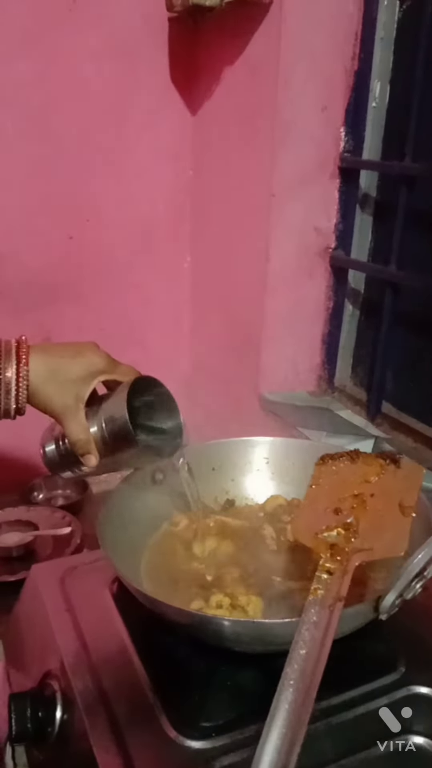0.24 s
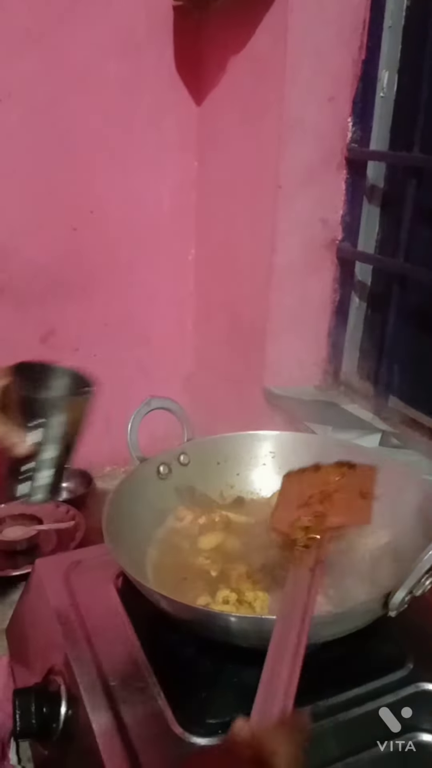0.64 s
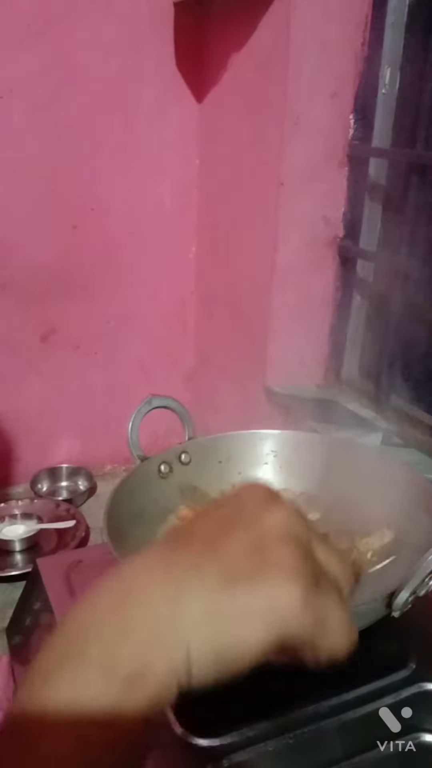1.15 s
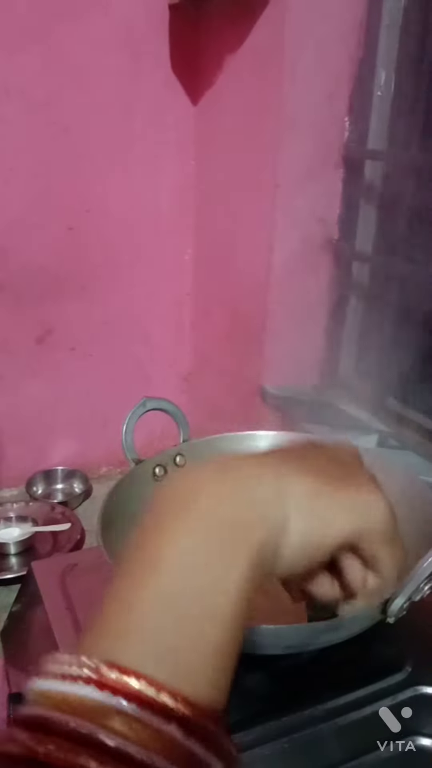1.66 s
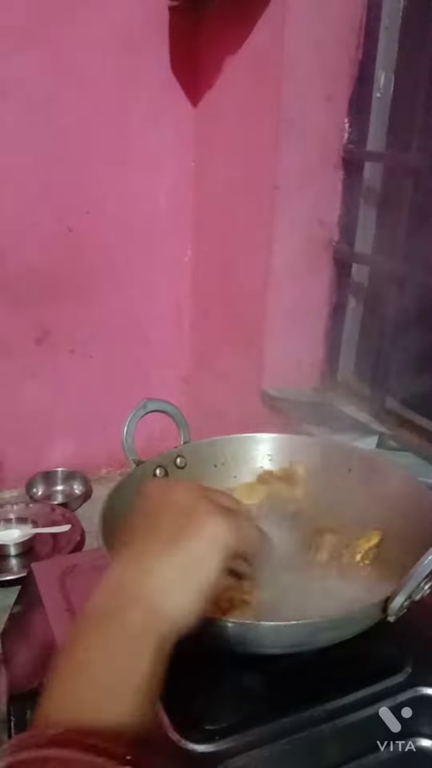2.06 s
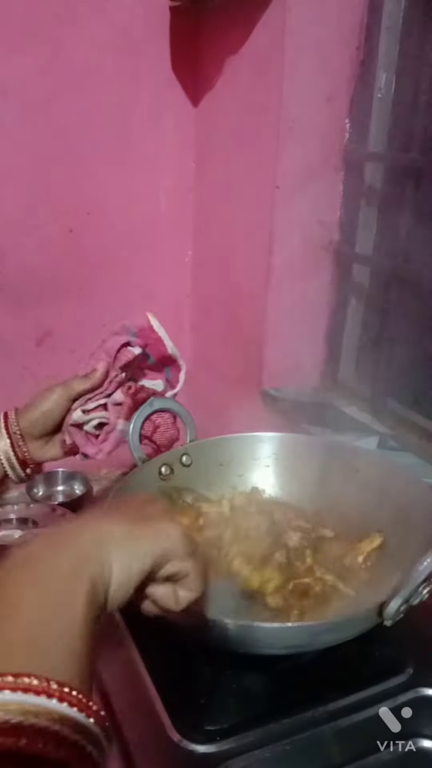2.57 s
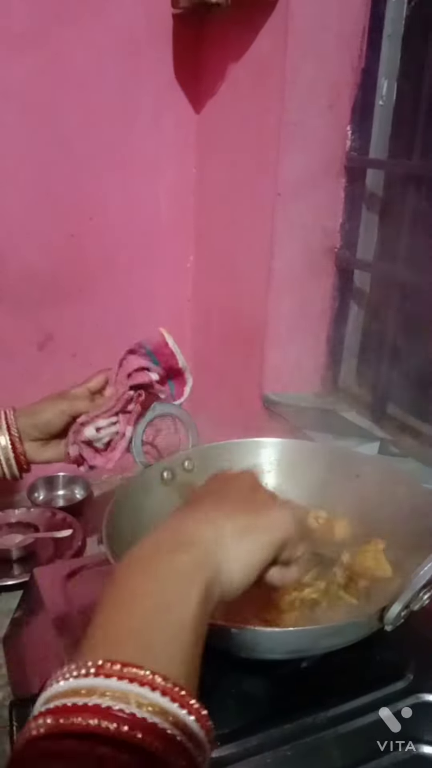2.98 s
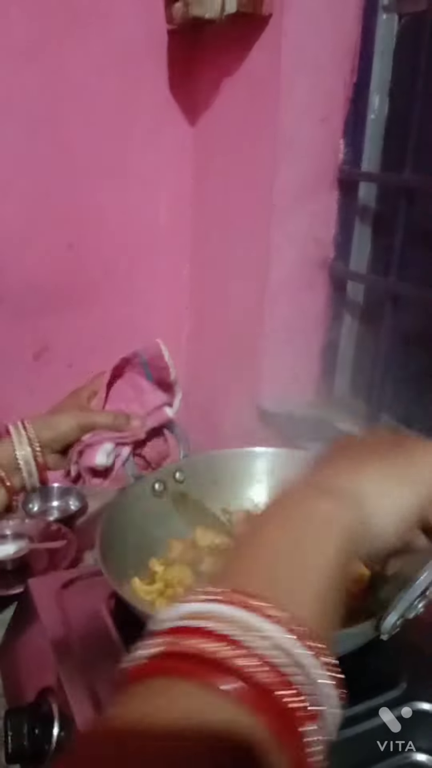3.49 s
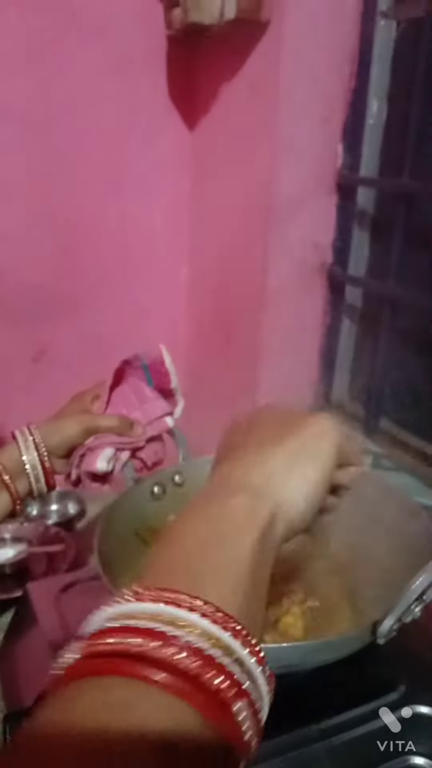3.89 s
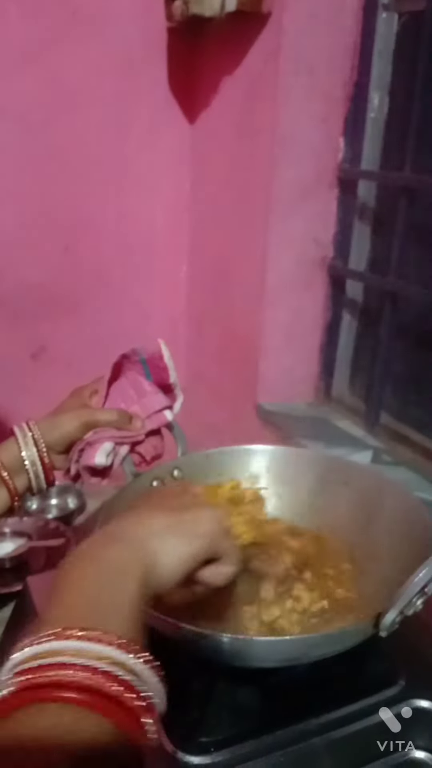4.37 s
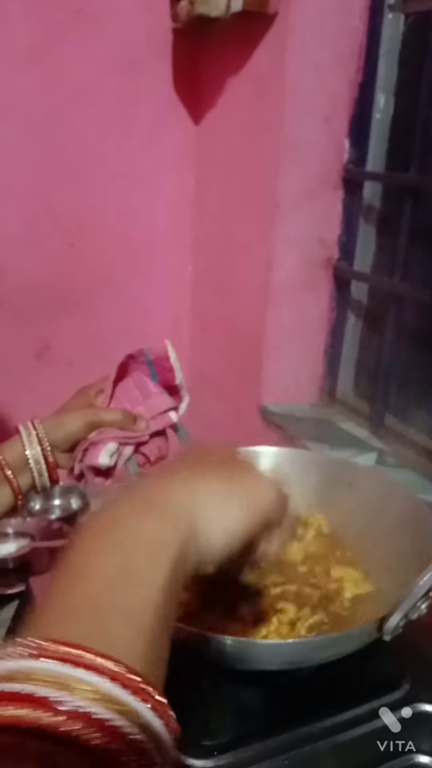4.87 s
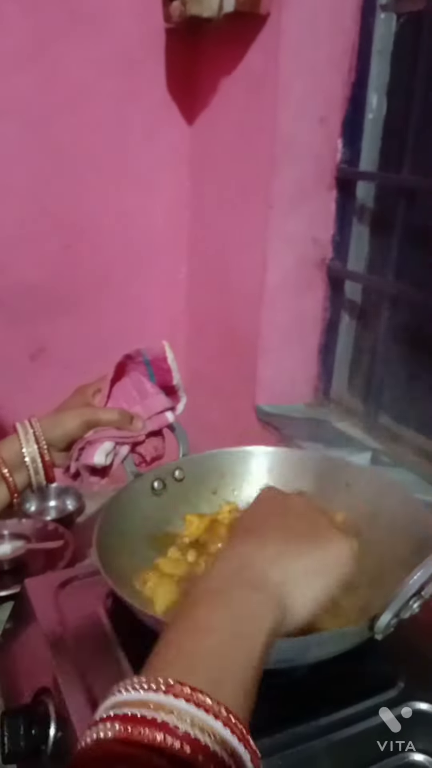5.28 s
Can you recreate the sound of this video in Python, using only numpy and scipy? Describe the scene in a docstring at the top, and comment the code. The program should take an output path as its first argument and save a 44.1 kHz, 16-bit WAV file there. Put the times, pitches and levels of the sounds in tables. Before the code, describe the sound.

A thin stream of water plunges into hot gravy under dense, crackling hiss. The pour stops, a spatula clacks on the pan, and stirring begins with short juddering scrapes and muffled thuds. The sizzle eases, then swells and sinks in uneven waves with bubbly crackle. Close, bright phone pickup in a small reflective kitchen, with faint low room noise.

```python
"""Water sizzling in a hot wok

Water is tipped from a steel cup into a hot aluminium wok of fried vegetables and flashes into a loud sizzle.
The sizzle is made of noise, random clicks and tiny ringing bubbles, following a table of levels over time.
A spatula knocks and drags: clicks ring the pan, and its stirring makes the larger bubbles louder.
A phone hears it from close by in a small hard-walled kitchen with a faint rumble.
"""
import sys
import numpy as np
from scipy import signal
from scipy.fft import rfft, irfft, next_fast_len
from scipy.io import wavfile
from scipy.ndimage import uniform_filter1d

SR = 44100
rng = np.random.default_rng(int(sys.argv[2]) if len(sys.argv) > 2 else 0)


def unload_wav(signal):
    """Save mono or channel-first audio to the path in sys.argv[1] as 16-bit WAV at rate SR, clipped to [-1, 1]."""
    wavfile.write(
        sys.argv[1],
        SR,
        np.round(np.clip(np.atleast_2d(signal).T, -1, 1) * 32767).astype(np.int16),
    )


N = 244161  # length of the scene in samples

# faint wavering rumble of the kitchen: (frequency [Hz], relative level [dB])
KITCHEN_COLOUR = [(25, -4), (70, -8), (115, 10), (170, 6.5), (300, 0), (1000, -36), (4000, -59)]
# the microphone port swallows a band of the treble: (frequency [Hz], gain [dB])
PORT_COLOUR = [(7900, 0), (8650, -3.5), (9200, -11), (10200, -9), (11400, -8.5), (12100, -3), (12900, 1)]
# ringing notes of the loaded pan on its burner:
# (frequency [Hz], time to fade by 60 dB [s], relative level [dB])
PAN_MODES = [(241, 0.15, -9.5), (256, 0.043, -3.5), (314.4, 0.2, -10), (367, 0.03, -14), (486, 0.045, 0),
             (607, 0.078, -18), (678.5, 0.086, 5), (864, 0.17, -17), (1079, 0.11, 3.5), (1117, 0.13, -4),
             (1230, 0.067, -4), (1280, 0.042, -6), (1698, 0.05, -15), (1870, 0.079, 0)]
# resonances of the open bowl that colour the sizzle and the spits:
# (frequency [Hz], width [Hz], relative level [dB])
BOWL_RESONANCES = [(724, 40, -21), (1131, 6, 5), (1273, 96, -9.5), (1710, 73, 1), (1870, 68, 2.5),
                   (2040, 8.3, -12), (2220, 14, -3), (2550, 33, -13), (2868, 18, -4), (3320, 140, -30),
                   (3260, 58, -9), (3740, 260, -14.5), (4490, 51, -2), (5710, 540, -7), (7600, 360, -10.5)]
# spatula blows on the pan; a hard contact has a high pitch:
# (time [s], peak level before the last filters [dB], pitch of the contact [Hz])
SPATULA_KNOCKS = [(.7912, -8.5, 1290), (.7935, -9, 990), (.797, -9.5, 423), (.9415, -22, 447),
                  (.9465, -21, 620), (1.315, -25, 258), (1.866, -30.5, 402), (2.118, -27.5, 255),
                  (2.913, -26.5, 317), (3.078, -27.5, 220), (4.033, -35, 219), (4.612, -27, 650)]
# spatula dragged through the food:
# (start [s], length [s], level before the last filters [dB], pitch of its judder [Hz])
SPATULA_STROKES = [(1.03, .23, -52, 335), (1.872, .14, -48, 320), (2.953, 0.33, -54.5, 317),
                   (3.284, 0.078, -46.5, 252), (3.56, 0.078, -52, 310), (3.743, 0.16, -46, 228),
                   (3.813, .07, -47.5, 400), (4.213, 0.074, -54.5, 314), (4.421, .11, -48.5, 278),
                   (4.612, 0.082, -48, 290), (4.773, .11, -47.5, 254), (5.112, 0.062, -50, 288),
                   (5.31, .12, -47.5, 800), (5.401, 0.1, -53.5, 237)]
# colour of the stream plunging into the gravy: (frequency [Hz], relative level [dB])
PLUNGE_COLOUR = [(50, -15), (100, -6.5), (150, -2.5), (220, -5), (380, 4.5), (600, -2.5), (1200, -15)]
# sharp spits of water on bare metal: (time [s], relative level [dB], time to fall to 37 % [s])
WATER_SPITS = [(4.6057, -16, 0.012), (5.12, -20, 0.013)]
# boiling on the hot metal: (time [s], relative sizzle level [dB])
BOIL_LEVEL = [(0.0, -20.5), (0.03, -22), (0.72, -22), (0.91, -26), (1.94, -26), (2.44, -30), (2.57, -26.5),
              (2.82, -23.5), (3.25, -29.5), (3.3, -25.5), (3.55, -25.5), (3.58, -23), (3.87, -29),
              (3.98, -22.5), (4.26, -22), (4.44, -25), (4.53, -22.5), (5.06, -31.5), (5.4, -26.5),
              (5.54, -32)]
# colour of the sizzle and the spits: (frequency [Hz], relative level [dB])
SIZZLE_COLOUR = [(200, -44), (450, -24), (640, -11), (950, -11.5), (1300, -7), (1900, -9.5), (2250, -8.5),
                 (3000, -4.5), (3900, 1), (5050, -4), (6000, -3), (7900, -1), (12500, -5), (15500, -4)]
# how each size of burst differs from the main sizzle:
# (level at rest [dB], share of the lost dB it keeps as the boil eases,
#  gain under the spatula [dB], loss as the water soaks in [dB/s])
GLUGS = (0.64, 0.14, 4.4, 0.69)
COARSE = (0.28, 0.15, 1.5, 0)
SPRAY = (-1.1, 0.21, 0, 0.22)

# after every blow the blade skids on through the food, bites quickly and slows to rest
SKID_DB, SKID_HZ, SKID_WIDTH_HZ, SKID_RISE_S, SKID_DECAY_S = -43, 273, 113, 0.021, 0.065
# the stream from the cup runs on, then thins as the cup is lifted
POUR_DB, POUR_END_S, POUR_FADE_DB_PER_S = -47.5, 0.55, 45
# sizzle level of a full boil, and the time over which the gravy smooths the stirring
FULL_BOIL_DB, CHURN_S = -24, 0.087
TOP_HZ = 15750

TIME = np.arange(N) / SR  # seconds
SIZE = next_fast_len(N + SR, True)  # filter length, with room for tails
FREQS = np.maximum(np.arange(SIZE // 2 + 1) * SR / SIZE, 1)  # Hz


def undb(db):
    """Turn decibels into a plain multiplier."""
    return 10 ** (np.asarray(db) / 20)


def unit(x):
    """Scale to an average strength (rms) of 1."""
    return x / np.sqrt(np.mean(x ** 2))


def curve(rows):
    """Join each column of a table by straight lines in time."""
    seconds, *columns = np.transpose(rows)
    return [np.interp(TIME, seconds, column) for column in columns]


def shape(x, response):
    """Filter a sound by multiplying its spectrum with a frequency response."""
    return irfft(rfft(x, SIZE) * response, SIZE)[..., :N]


def colour(points):
    """Frequency response drawn through (frequency [Hz], level [dB]) points."""
    hz, db = np.transpose(points)
    return undb(np.interp(np.log(FREQS), np.log(hz), db))


def resonance(hz, width):
    """Response of one resonance, with gain 1 at its centre."""
    return 1 / (1 + 1j * (FREQS ** 2 - hz ** 2) / (FREQS * width))


def walk(rate):
    """Smooth random wandering that changes about rate times a second, with rms 1."""
    return unit(shape(rng.standard_normal(N), 1 / (1 + (FREQS / rate) ** 4)))


def pops(rate, spread_db, cap_db=20):
    """Random clicks, about rate a second: most are small, a few large."""
    size = undb(np.minimum(spread_db * rng.exponential(size=N), cap_db))
    happens = rng.random(N) < rate / SR
    return unit(happens * size * rng.choice([-1, 1], N))


def kitchen(floor_db=-72, waver_db=3):
    """Faint low noise of the kitchen, whose level wavers."""
    rumble = unit(shape(rng.standard_normal(N), colour(KITCHEN_COLOUR)))
    return undb(floor_db + waver_db * walk(rate=9.1)) * rumble


def room(x, wet_db, t60=0.25, boom_hz=100, boom_width_hz=11, boom_db=12):
    """Near walls return a short wash of echoes, and one standing wave booms on."""
    wash = rng.standard_normal(N) * np.exp(-np.log(1000) * TIME / t60)
    wash *= TIME > .004  # the first echoes need time to return
    walls = undb(wet_db) * rfft(wash / np.linalg.norm(wash), SIZE)
    boom = resonance(boom_hz, boom_width_hz) * resonance(boom_hz, 3 * boom_width_hz)
    return shape(x, 1 + walls + undb(boom_db) * boom)


def stove(hz=100, rise_s=0.041, wobble=0.78, blow_db=-31.0, stroke_db=-14):
    """Blows and mid-strokes rock the loose stove top; its unsteady low note swells and dies away."""
    shoves = [(s, db + blow_db) for s, db, _ in SPATULA_KNOCKS]
    shoves += [(s + length / 2, db + stroke_db) for s, length, db, _ in SPATULA_STROKES]
    swell = np.zeros(N)
    for s, db in shoves:
        age = np.maximum(TIME - s, 0) / rise_s
        swell = np.maximum(swell, undb(db) * (age * np.exp(1 - age)) ** 2)
    return swell * np.sin(2 * np.pi * hz * TIME + wobble * walk(rate=34))


def pan_response(thud_db=-4, thud_s=0.025, thud_low_hz=340, thud_high_hz=1750):
    """A blow rings the pan's own notes, plus a short dull rattle against its stand."""
    ring = np.zeros(N)
    for hz, t60, db in PAN_MODES:
        ring += undb(db) * np.sin(2 * np.pi * hz * TIME) * np.exp(-np.log(1000) * TIME / t60)
    band = 1 / (1 + (thud_low_hz / FREQS) ** 2) / (1 + (FREQS / thud_high_hz) ** 6)
    rattle = unit(shape(rng.standard_normal(N), band)) * np.exp(-TIME / thud_s)
    return rfft(ring + undb(thud_db) * rattle, SIZE)


def pressure(s, length):
    """The hand leans into a stroke and lets go again."""
    return np.maximum(1 - (2 * (TIME - s) / length - 1) ** 2, 0) ** 0.58


def skidding():
    """Speed of the blade as it skids on after each blow."""
    ages = [np.maximum(TIME - s, 0) for s, _, _ in SPATULA_KNOCKS]
    speeds = [np.minimum(age / SKID_RISE_S, 1) * np.exp(-age / SKID_DECAY_S) for age in ages]
    return np.max(speeds, axis=0)


def spatula(contact_width=0.92, settle=11, judder_db=2, grit_db=-6, grit_hz=470, grit_width_hz=500,
            lowest_hz=175, highest_hz=2100):
    """Blows ring the pan; drags and skids catch and slip, juddering around one pitch and grating."""
    pan, out = pan_response(), np.zeros(N)
    for s, db, hz in SPATULA_KNOCKS:
        # food cushions some blows, which gives them a lower contact pitch
        contact = abs(resonance(hz, contact_width * hz)) ** 2
        blow = shape(signal.unit_impulse(N, int(s * SR)), pan * contact)
        out += undb(db) * blow / abs(blow).max()
    slips = pops(rate=580, spread_db=1.5) * undb(judder_db * walk(rate=86))
    grit = unit(shape(slips, pan * resonance(grit_hz, grit_width_hz)))
    for s, length, db, hz in SPATULA_STROKES:
        press = pressure(s, length)
        # the longer the drag, the more its judder settles on one note
        judder = unit(shape(slips, resonance(hz, settle / length) * resonance(hz, hz / 2)))
        drag = press * (judder + undb(grit_db) * grit)
        out += undb(db) * drag / np.std(drag[press > 0])
    skid = unit(shape(slips, resonance(SKID_HZ, SKID_WIDTH_HZ) ** 2))
    out += undb(SKID_DB) * skidding() * (skid + undb(grit_db) * grit)
    # the pan gives out little deep bass, and the soft blade excites no treble
    return shape(out, 1 / (1 + (lowest_hz / FREQS) ** 8) / (1 + (FREQS / highest_hz) ** 8))


def pour(gulp_db=1.5):
    """The stream plunges into the gravy in a quick, uneven run of small gulps."""
    gulps = pops(rate=430, spread_db=1)
    flow_db = POUR_DB - POUR_FADE_DB_PER_S * np.maximum(TIME - POUR_END_S, 0)
    return unit(shape(gulps, colour(PLUNGE_COLOUR))) * undb(flow_db + gulp_db * walk(rate=22))


def spits(hz=5200, width_hz=7000):
    """A drop flashes to steam at once, a burst of noise that dies quickly."""
    flash = np.zeros(N)
    for s, db, decay in WATER_SPITS:
        flash += undb(db) * (TIME >= s) * np.exp(-abs(TIME - s) / decay)
    return flash * unit(shape(rng.standard_normal(N), resonance(hz, width_hz))) / 2


def bubbles(count, low_hz, high_hz, cycles, spread_db, glide):
    """Small bubbles that each ring for some cycles and rise in pitch as they burst."""
    out = np.zeros(N + SR)
    for when, pitch, chance in rng.random((count, 3)):
        hz = low_hz * (high_hz / low_hz) ** pitch
        age = np.linspace(0, 1, int(SR * cycles / hz) + 2)  # from start to end of its ring
        phase = 2 * np.pi * cycles * age * (1 + glide * age / 2)
        ring = np.sin(phase) * np.exp(-np.log(100) * age)
        loudness = hz ** 0.63 * undb(-spread_db * np.log(max(chance, .02)))
        start = int(when * N)
        out[start:start + len(age)] += ring * loudness
    # such small bubbles give out no bass
    return unit(shape(out[:N], 1 / (1 + (low_hz / FREQS) ** 4)))


def burst_sizes(loud):
    """Relative dB of glugs, coarse bubbling and fine spray: all outlast the main sizzle; stirring lifts big ones."""
    strokes = [pressure(s, length) for s, length, _, _ in SPATULA_STROKES]
    stirring = np.max([skidding()] + strokes, axis=0)
    churn = uniform_filter1d(stirring, int(CHURN_S * SR))
    eased_db = FULL_BOIL_DB - loud
    return [rest + keeps * eased_db + stirred * churn - soak * TIME
            for rest, keeps, stirred, soak in (GLUGS, COARSE, SPRAY)]


def sizzle(steam_db=0, crackle_db=-3, bubble_db=-6, sputter_db=0.15, flicker_db=0.76, level_db=-0.78):
    """Droplets burst and bubbles ring over a hiss of steam; each size of burst flickers by itself."""
    loud, = curve(BOIL_LEVEL)
    glugs, coarse, fine = burst_sizes(loud)
    steam = undb(steam_db) * rng.standard_normal(N)
    crackle = undb(crackle_db) * pops(rate=9000, spread_db=5.5, cap_db=11)
    froth = bubbles(count=8000, low_hz=584.8, high_hz=7200, cycles=29.3, spread_db=-0.5, glide=0.14)
    mix = unit(steam + crackle + undb(bubble_db) * froth)
    boil = mix * undb(loud + level_db + sputter_db * walk(rate=56))
    # split by pitch: the bigger the burst, the deeper its sound
    deep = 1 / (1 + (FREQS / 950) ** 8)
    low = 1 / (1 + (FREQS / 2400) ** 6)
    high = 1 / (1 + (10000 / FREQS) ** 8)
    sizes = [(deep, glugs), (low - deep, coarse), (1 - low - high, 0), (high, fine)]
    return sum(shape(boil, share) * undb(db + flicker_db * walk(rate=19)) for share, db in sizes)


def bowl(x, wander_db=2):
    """The open bowl colours every burst; its resonances come and go as the food and the hand move."""
    direct = shape(x, colour(SIZZLE_COLOUR))
    rings = np.zeros(N)
    for hz, width, db in BOWL_RESONANCES:
        rings += shape(direct, resonance(hz, width)) * undb(db + wander_db * walk(rate=6.0))
    return 2 * (direct + rings)


def scene():
    """Mix all sounds alike into both channels; the bowl aims the sizzle at the phone, so it is drier."""
    boiling = room(bowl(sizzle() + spits()), wet_db=-8)
    handling = room(pour() + spatula(), wet_db=-6.5)
    sound = kitchen() + stove() + handling + boiling
    return np.array([sound, sound])


def record(dry):
    """The phone's port colours the treble and a steep filter cuts off the top."""
    top_cut = signal.ellip(12, .2, 80, TOP_HZ, fs=SR, output="sos")
    return signal.sosfilt(top_cut, shape(dry, colour(PORT_COLOUR)))


dry = scene()
out = record(dry)
unload_wav(out)
```